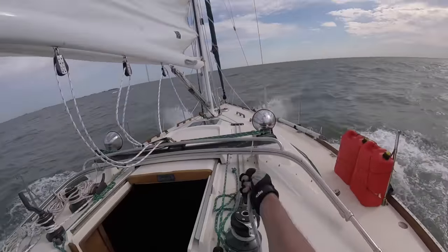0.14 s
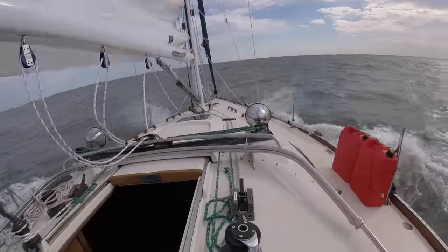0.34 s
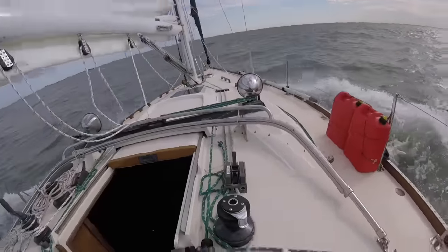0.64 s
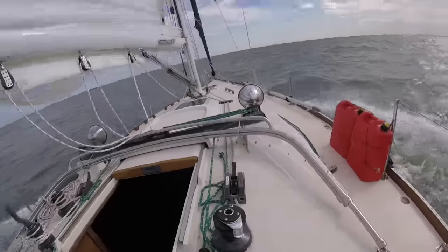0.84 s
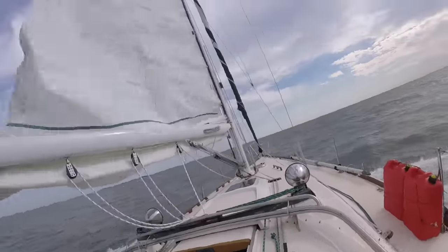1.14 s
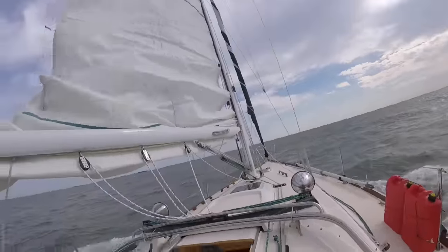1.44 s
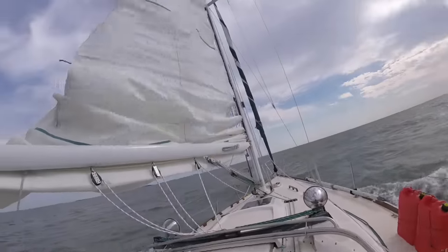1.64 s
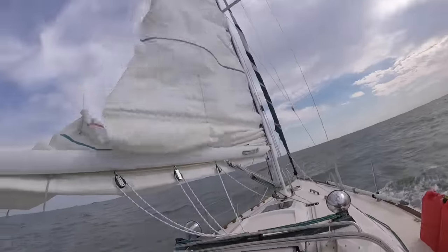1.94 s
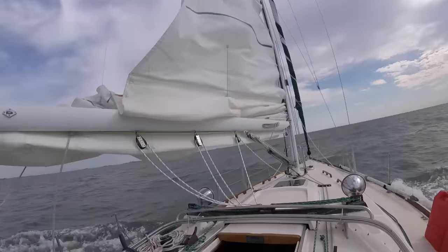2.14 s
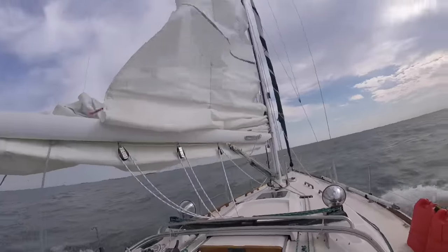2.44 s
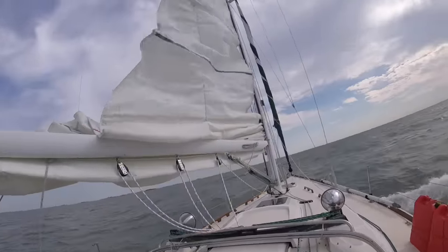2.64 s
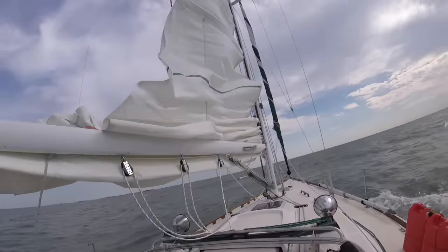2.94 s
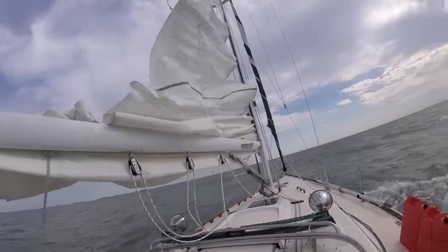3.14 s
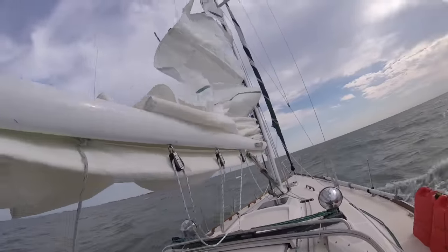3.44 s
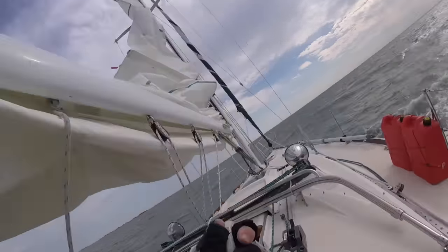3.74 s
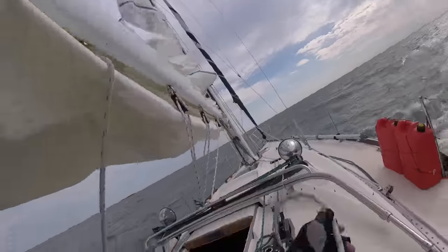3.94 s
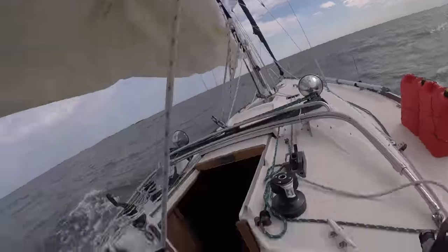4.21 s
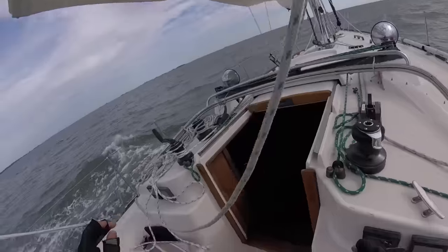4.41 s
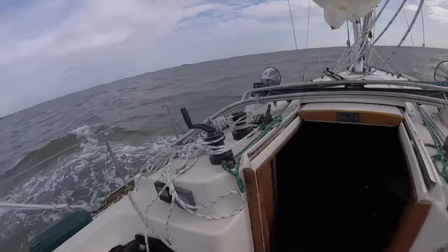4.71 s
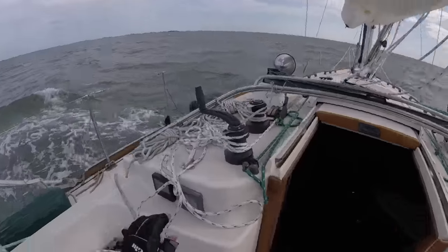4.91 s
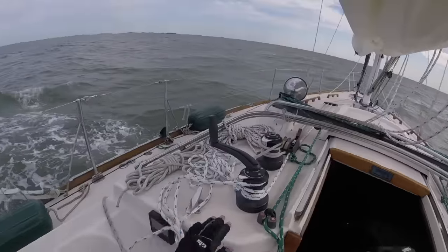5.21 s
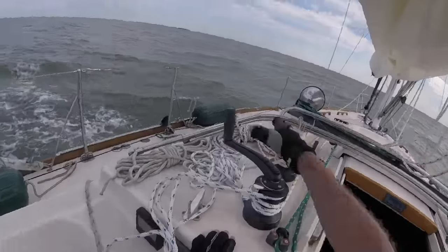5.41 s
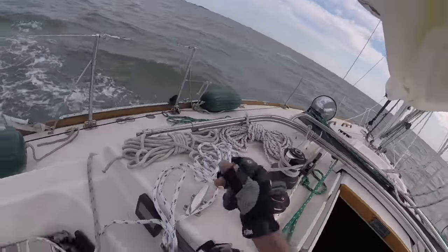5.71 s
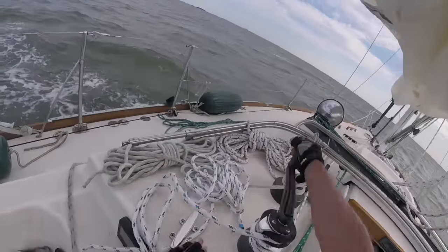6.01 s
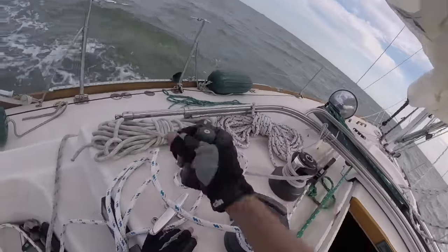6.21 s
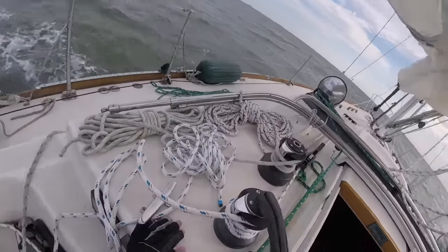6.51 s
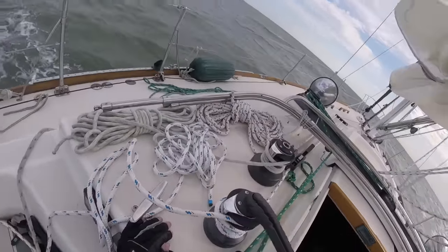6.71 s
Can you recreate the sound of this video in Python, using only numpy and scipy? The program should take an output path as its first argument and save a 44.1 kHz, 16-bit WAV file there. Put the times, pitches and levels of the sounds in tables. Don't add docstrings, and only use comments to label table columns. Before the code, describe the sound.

Heavy wind rumbles, flutters and thumps on a small microphone aboard a sailboat, with sail snaps, faint hull wash, then a rapid clacking winch.

```python
import sys
import numpy as np
from scipy import signal
from scipy.io import wavfile
from scipy.ndimage import uniform_filter1d

SR = 44100
rng = np.random.default_rng(int(sys.argv[2]) if len(sys.argv) > 2 else 0)


def makeup_ratio(level_db):
    decades = np.asarray(level_db, float) / 20
    return 10 ** decades


def persist_wave(psi):
    counts = np.round(np.clip(psi, -1, 1) * 32767).astype(np.int16)
    wavfile.write(sys.argv[1], SR, np.atleast_2d(counts).T)


N = 302526

# f/Hz, level per Hz/dB
RUMBLE_COLOUR = [(8.8, -28.5), (15, -7), (38, 3.5), (65, 2), (103, -3), (300, -21), (390, -45), (660, -120)]
# f/Hz, level per Hz/dB
FLUTTER_COLOUR = [(60, -8.5), (130, 3), (200, 0), (350, -7.5), (600, -22.5), (1000, -33), (2000, -52),
                  (4000, -64.5)]
# t/s, level/dB
BREEZE_LEVEL = [(0.0, -22.3), (0.34, -26.0), (0.63, -16.2), (0.92, -26.7), (1.64, -21.2), (1.83, -21.5),
                (2.44, -21.7), (2.56, -30.7), (2.79, -23.4), (3.11, -19.2), (3.59, -20.4), (3.9, -16.6),
                (4.22, -20.6), (4.51, -18.1), (4.83, -22.1), (5.58, -23.0), (5.77, -22.9), (6.86, -20)]
# start t/s, length/s, level/dB, flutter above it/dB
PORT_GUSTS = [(0.257, 0.064, -17.0, -18.9), (0.389, 0.041, -12.1, -12.8), (0.496, 0.042, -12.2, -3.5),
              (0.552, 0.06, -11.1, -4.0), (0.653, 0.028, -17.9, 0.1), (0.767, 0.025, -13.1, -3.0),
              (0.941, 0.028, -5.4, -25.0), (1.226, 0.052, -5.9, -21.6), (1.301, 0.053, -7.7, -9.1),
              (1.652, 0.04, -10.5, -12), (1.723, 0.073, -20.6, -3.2), (1.84, 0.033, -10.7, -8.7),
              (2.002, 0.066, -16.0, -0.9), (2.068, 0.04, -14.0, -2.6), (2.243, 0.067, -16.2, -7.4),
              (2.383, 0.127, -19.0, -6.2), (2.552, 0.028, -10, -10), (2.77, 0.06, -23.0, -1.0),
              (2.948, 0.025, -16.8, 8.2), (2.98, 0.1, -10, -3), (3.08, 0.068, -15.6, -2.1),
              (3.196, 0.045, -14.1, -10.9), (3.277, 0.043, -13.4, -10.6), (3.405, 0.097, -20.8, -7),
              (3.68, 0.086, -13, -12), (3.897, 0.054, -15.1, -8.2), (3.967, 0.065, -11.7, -13.3),
              (4.101, 0.033, -11.2, -22.1), (4.305, 0.096, -17.2, -24.3), (4.426, 0.043, -11.6, -14),
              (4.546, 0.035, -18.3, 7.1), (4.598, 0.028, -9.1, -6), (4.63, 0.04, -19, 1),
                     (4.745, 0.022, -15, -1), (4.53, .02, -20, 0), (4.763, 0.026, -4.0, -15.4),
                     (4.895, 0.028, -8.1, -19.7), (4.952, 0.02, -16.1, -4), (5.027, 0.028, -8.1, -19.2),
                     (5.214, 0.024, -14.9, -10), (5.285, 0.03, -17.0, -10.0), (5.376, 0.022, -23.1, -4.4),
                     (5.495, 0.069, -17.7, -7.4), (5.664, 0.029, -14.6, -6.3), (5.713, 0.042, -17.6, -4.8),
                     (5.806, 0.088, -11.1, -5.1), (5.927, 0.079, -14.7, -6.8), (6.073, 0.053, -17.8, 2.1),
                     (6.176, 0.033, -10.8, -9.5), (6.215, 0.12, -18.3, -1.5), (6.336, 0.051, -10.0, -7),
                     (6.458, 0.042, -10.3, -18.7), (6.512, 0.048, -10.5, -5.8),
                     (6.619, 0.037, -10.0, -18.0), (6.702, 0.059, -16.4, 2.2), (6.768, 0.031, -11.1, -0.2),
                     (6.813, 0.033, -10.8, -11.9)]
# t/s, peak level/dB, throb f/Hz
EDDY_PUFFS = [(0.39, -11.5, 82), (0.502, -10.5, 90), (0.581, -4.5, 112), (0.661, -7, 182), (0.955, -15, 77),
              (1.184, -16, 70), (1.225, -15.5, 46), (1.312, -3.5, 78), (1.544, -23, 121), (1.668, -8, 45),
              (1.734, -19, 167), (1.848, -11, 46), (1.946, -10.5, 165), (2.042, -14.5, 56),
              (2.272, -13.5, 46), (2.415, -20, 83), (2.952, -13.5, 182), (2.98, -11, 75),
              (4.024, -18.5, 180), (4.552, -10.5, 85), (4.76, -15.5, 66), (4.904, -14.5, 93),
              (4.951, -13.5, 90), (5.213, -10, 105), (5.38, -17.5, 69), (5.729, -9.5, 96),
              (5.849, -12.5, 178), (6.468, -7.5, 102), (6.63, -11.5, 57), (6.773, -9, 101)]
# t/s, peak level/dB
AIR_SLAPS = [(0.075, -26), (0.574, -19), (0.651, -14), (1.244, -22), (1.339, -16), (1.68, -16),
             (1.854, -19), (1.944, -20), (2.087, -17), (2.571, -18), (2.952, -21), (3.129, -21),
             (4.402, -21), (4.556, -18), (4.608, -23), (4.768, -20), (4.864, -29), (4.907, -24),
             (4.952, -26), (5.035, -28), (5.071, -30), (5.177, -22), (5.381, -24), (5.726, -21),
             (5.811, -24), (5.834, -22), (6.368, -24), (6.471, -17), (6.507, -26), (6.617, -27),
             (0.61, -25), (0.897, -25), (1.208, -25), (1.316, -21), (2.056, -22), (2.985, -20),
             (3.016, -24), (3.033, -20), (3.087, -24), (3.142, -24), (3.22, -24), (4.323, -28),
             (4.368, -29), (5.189, -25), (5.214, -20), (0.776, -24), (6.774, -22), (6.783, -22)]
# t/s, peak level/dB, centre f/Hz, low knock level/dB
WINCH_CLACKS = [(5.7415, -24.5, 6270, -12), (5.8067, -27, 6230, -8), (5.8893, -36, 2830, -13),
                (5.8985, -26.5, 5630, -13), (5.9134, -41, 2800, -12), (5.9346, -28.5, 5100, -15),
                (6.0166, -23, 6240, -8), (6.0457, -22, 6590, -18), (6.0937, -38, 3700, 9),
                (6.1036, -21, 6660, -17), (6.1256, -22, 6390, -19), (6.1716, -25.5, 6480, -14),
                (6.2076, -26, 6470, -19), (6.3013, -37.5, 3320, -2.5), (6.3468, -24, 7000, -6),
                (6.3665, -25, 7500, 2), (6.3806, -19, 6050, -7), (6.4044, -35, 3120, 9),
                (6.4158, -18, 5660, 2), (6.4684, -22.5, 6350, -3), (6.5091, -26, 8900, -2),
                (6.5478, -24, 6800, -6), (6.5822, -21, 6800, -8), (6.6229, -25.5, 5900, 3),
                (6.647, -39, 6600, -10), (6.6595, -20, 5720, 1), (6.745, -33.5, 5600, -7),
                (6.7613, -17.5, 4820, 3.5), (6.8247, -24.5, 5900, -8), (6.8388, -30, 3700, 6),
                (5.729, -40, 5800, -10), (5.8615, -42, 3700, -3), (5.929, -41, 6500, -10),
                (6.82, -42, 6500, -10), (6.852, -40, 9300, -12), (6.75, -36, 6000, -7)]
# t/s, f/Hz, level/dB, time to fall by 60 dB/s
METAL_RINGS = [(5.13, 1135, -33, .05), (5.13, 1500, -33, 0.06), (5.13, 3550, -42, .04),
               (6.104, 6200, -23, 0.025), (6.207, 6080, -27, 0.026), (6.349, 5690, -18, 0.028),
               (6.351, 10400, -41, .04), (6.381, 5650, -15.5, 0.06), (6.382, 10650, -44, 0.056),
               (6.418, 8800, -33, .03), (6.549, 10300, -46, 0.052), (6.47, 8550, -33, 0.044),
               (6.509, 5660, -20, 0.047), (6.51, 10300, -44, .07), (6.548, 5730, -19, 0.025),
               (6.583, 5690, -20.5, 0.043), (6.582, 10800, -32, .03), (6.628, 8450, -42, .09),
               (6.662, 9100, -32, 0.045), (6.661, 5710, -22, .035), (6.762, 8220, -11, 0.014),
               (6.763, 3620, -25, 0.038), (6.84, 3760, -40, 0.041), (6.349, 13000, -32, .03),
               (6.51, 13000, -40, .025), (6.763, 2500, -24, .03), (6.763, 4820, -24, .025),
               (6.772, 8150, -38, .04), (6.623, 2350, -30, .025), (6.659, 1400, -27, .03),
               (6.416, 2300, -28, .025), (6.548, 9200, -30, .025), (6.367, 7450, -30, .02),
               (6.556, 5720, -23, .035), (6.469, 11000, -34, .025), (6.826, 6110, -28, .025),
               (5.742, 5940, -30, .025)]
# t/s, peak level/dB, centre f/Hz, low knock level/dB
SAIL_SNAPS = [(0.0772, -26, 6500, 4), (0.5457, -29, 5070, 4), (0.6455, -24, 5400, 6),
              (0.7285, -31, 5900, -12), (0.826, -13, 8600, -7), (1.2894, -33, 3270, -2),
              (1.4127, -29, 5030, -11.5), (1.6082, -36, 6340, 6), (1.8344, -39, 3890, 6),
              (1.8623, -29, 5190, -3), (1.9618, -41, 3320, 7.5), (2.376, -34, 3550, -11),
              (2.7144, -35, 6300, -8), (2.9537, -28.5, 5600, -1), (3.1298, -31, 7900, -17),
              (3.14, -33.5, 3550, 1.5), (3.143, -31, 7900, -15), (3.2181, -38, 3300, 5),
              (3.2867, -30, 5160, -10), (3.555, -38.5, 5600, 6), (3.864, -40, 3260, 0),
              (4.278, -40, 4500, 3), (4.068, -34, 6400, -0.5), (4.148, -44, 5110, 9),
              (5.0325, -49, 2600, 15), (5.1262, -38, 4900, 3), (5.132, -38, 3600, 4),
              (5.2165, -52, 2400, 14), (5.5922, -41, 3280, 7), (5.605, -39.5, 6360, -4)]
# t/s, level/dB
WAKE_LEVEL = [(0, -48.5), (.44, -45.5), (.73, -45), (1.14, -45.5), (1.33, -48), (2.11, -50), (2.56, -50),
              (3.06, -52), (3.75, -48), (4.27, -47.5), (4.51, -52), (4.84, -50.5), (5.18, -56), (5.69, -52),
              (5.96, -48), (6.4, -48), (6.7, -49), (6.86, -47)]
# start t/s, length/s, level above the steady rush/dB
HULL_SLOSHES = [(0.84, .11, 3), (0.87, .04, 3), (1.79, .05, 3), (3.5, .06, 2), (3.67, .08, 5),
                (3.82, .05, 3), (3.895, .07, 5), (4.043, .04, 3), (4.19, .04, 2), (4.246, .054, 4),
                (4.39, .04, 3), (5.075, .05, 4), (5.135, .04, 4), (5.185, .025, 11), (5.4, .03, 4),
                (5.45, .06, 5), (6.42, .05, 4), (6.66, .05, 4), (5.58, .06, 4), (0.92, .25, 2)]
# f/Hz, level per Hz/dB
HISS_COLOUR = [(1100, -24), (1800, -0.5), (3300, -3.5), (4100, -9.5), (4900, -3), (5700, -4.5), (6550, -4),
               (7100, -12.5), (9200, -19), (9800, -26.5), (11000, -29), (12000, -39.5), (14000, -42),
               (16500, -56)]
# f/Hz, level per Hz/dB
WASH_COLOUR = [(250, -8.5), (500, 2), (1000, -4), (1600, -7.5), (2500, -18), (4000, -27.5)]
# t/s, peak level/dB
SWAP_TICKS = [
    (4.506, -40),
    (4.57, -34.5),
    (4.9554, -43),
    (4.9851, -36),
    (5.177, -42),
    (5.3054, -49),
]

GUST_RISE_S, GUST_FALL_S = .007, .005
BREEZE_RUMBLE_DB, BREEZE_FLUTTER_DB = -0.6, -7.5
PUFF_S = .027
FLICKS_PER_S, FLICK_S, FLICK_DB = 60, .0011, -3.5
CLACK_EDGE_DB, TOOTH_DB = -12, -4
BOUNCE_S, BOUNCE_DB = .004, -10
RATTLE_DB, RATTLE_T60_S = -10, .014
DECK_DB, DECK_T60_S = -20, .08
RING_KNEE_DB, RING_ROUGH = -8, .25
SNAP_MID_DB, SNAP_T60_S, SNAP_T60_S_PER_DB = -33, .032, .0006
SNAP_EDGE_DB, SNAP_EDGE_PER_DB = -20, .6
SWAP_S, SHELTER_HISS_DB, SHELTER_WASH_DB, WASH_ABOVE_DB = 4.508, -10, -8, 7


def evened(x):
    return x / np.sqrt(np.mean(x ** 2) + 1e-20)


def peaked(x):
    return x / np.max(abs(x))


def add(mix, s, sound):
    part = mix[round(s * SR):][:len(sound)]
    part += sound[:len(part)]


def curves(rows):
    s, *columns = np.transpose(rows)
    return [np.interp(np.arange(N) / SR, s, c) for c in columns]


def band(x, lo_hz, hi_hz, order=2):
    limits = [lo_hz, min(hi_hz, SR / 2.2)]
    return signal.sosfilt(signal.butter(order, limits, "bandpass", fs=SR, output="sos"), x)


def noise(colour, size, patchy_db, flicker_db):
    hop, hz = size // 4, np.fft.rfftfreq(size, 1 / SR)
    a, b, patches = rng.standard_normal((N // hop + 5, len(hz), 3)).T
    flicker = evened(uniform_filter1d(patches[0], size=3))
    patches = uniform_filter1d(patches, size=6, axis=0)
    patches = evened(uniform_filter1d(patches, size=8, axis=1))
    f, db = np.transpose(colour)
    shape_db = np.interp(np.log(hz + 1), np.log(f), db, left=-90, right=-90)[:, None]
    z = (a + 1j * b) * makeup_ratio(shape_db + patchy_db * patches + flicker_db * flicker)
    return evened(signal.istft(z, nperseg=size, noverlap=size - hop)[1][:N])


def lumps(hz):
    lowpass = signal.butter(2, hz, fs=SR, output="sos")
    return evened(signal.sosfilt(lowpass, rng.standard_normal(N)))


def steadied(x, size):
    power = uniform_filter1d(uniform_filter1d(x ** 2, size), size)
    swell = np.sqrt(power + 0.074)
    return evened(x / swell ** 0.9)


def burst(t60, rise, draw):
    t = np.arange(len(draw)) / SR
    return draw * (1 - np.exp(-t / rise)) * makeup_ratio(-60 * t / max(t60, .004))


def crack(draw, hz, low_db, top_db, t60, low_t60, low_hz, scratch_db):
    body = peaked(band(burst(t60, 0.0008, draw), hz * 0.76, hz * 1.08))
    scratch = peaked(band(burst(.8 * t60, 0.0009, np.roll(draw, shift=999)), 1700.0, 7500.))
    knock = peaked(band(burst(low_t60, 0.0011, draw), .5 * low_hz, 1.89 * low_hz))
    edge = peaked(band(burst(t60, 0.00046, draw[::-1]), 5900.0, 9400.0))
    return body + makeup_ratio(scratch_db) * scratch + makeup_ratio(low_db) * knock + makeup_ratio(top_db) * edge


def strength():
    t, (breeze_db,) = np.arange(N) / SR, curves(BREEZE_LEVEL)
    rumble = makeup_ratio(2 * (breeze_db + BREEZE_RUMBLE_DB))
    flutter = makeup_ratio(2 * (breeze_db + BREEZE_FLUTTER_DB))
    for s, length, db, flutter_db in PORT_GUSTS:
        u = t[:round((length + .3) * SR)]
        rise = np.minimum(u / GUST_RISE_S, 1) ** 2
        shape = rise * np.exp(-np.maximum(u - length + GUST_FALL_S, 0) / GUST_FALL_S)
        add(rumble, s, makeup_ratio(2 * db) * shape)
        add(flutter, s, makeup_ratio(2 * (db + flutter_db)) * shape)
    return 10 * np.log10(rumble), 10 * np.log10(flutter)


def wind():
    rumble_db, flutter_db = strength()
    lump = lumps(hz=30.4)
    rumble = steadied(noise(RUMBLE_COLOUR, size=8192, patchy_db=2.5, flicker_db=2.5), size=1400)
    flutter = steadied(noise(FLUTTER_COLOUR, size=2048, patchy_db=1.5, flicker_db=-1.0), size=900)
    force_db = flutter_db - 3 + 3.0 * lump
    rasp = evened(band(rng.standard_normal(N), 380., 917.0))
    rasp_db = -40 + 1.45 * np.minimum(force_db + 20.5, 4) + 3 * lumps(hz=90.)
    return makeup_ratio(rumble_db + 1.9 * lump) * rumble + makeup_ratio(force_db) * flutter + makeup_ratio(rasp_db) * rasp


def puffs():
    out, t = np.zeros(N), np.arange(5000) / SR
    draws = rng.standard_normal((len(EDDY_PUFFS), 5000))
    u = t / (0.29 * PUFF_S)
    swell = u * np.exp(1 - u)
    for (s, db, hz), draw in zip(EDDY_PUFFS, draws):
        sagging_hz = hz * (1.25 - 0.125 * np.minimum(u, 5))
        throb = np.sin(2 * np.pi * np.cumsum(sagging_hz) / SR + 3 * draw[0])
        ragged = peaked(band(draw * swell, 170.0, 455.0))
        add(out, s - .003, makeup_ratio(db - 3.5) * (swell * throb + makeup_ratio(-4) * ragged))
    return out


def slaps():
    out, u = np.zeros(N), (np.arange(1500) / SR - .004) / 0.0006
    draws = rng.standard_normal((len(AIR_SLAPS), 1500))
    for (s, db), draw in zip(AIR_SLAPS, draws):
        narrow = u * np.exp(0.1 * draw[0])
        spike = (1 - narrow ** 2) * np.exp(-narrow ** 2 / 2)
        skirt = peaked(band(burst(0.033, .003, draw), 350.0, 1000.0))
        add(out, s - .0015, makeup_ratio(db + 5.5) * (spike + makeup_ratio(-12) * skirt))
    return out


def flicks():
    u = np.arange(-400, 400) / SR / FLICK_S
    spike = (1 - u ** 2) * np.exp(-u ** 2 / 2)
    flick_db = strength()[1] + FLICK_DB + 3.5 * np.minimum(rng.exponential(1, N), 3)
    strikes = rng.random(N) < FLICKS_PER_S / SR
    return signal.oaconvolve(makeup_ratio(flick_db) * strikes, spike, "same")


def rattle(chance, t):
    pitch, late, size = chance[:, :, None]
    u = np.maximum(t - 2 * BOUNCE_S * late, 0)
    tones = np.sin(2 * np.pi * 3000. * 3.4 ** pitch * u)
    return peaked((makeup_ratio(10 * size - 60 * u / RATTLE_T60_S) * tones).sum(axis=0))


def clacks():
    out, t = np.zeros(N), np.arange(4000) / SR
    draws = rng.standard_normal((len(WINCH_CLACKS), 4000))
    chances = rng.random((len(WINCH_CLACKS), 3, 8))
    for (s, db, hz, low_db), draw, chance in zip(WINCH_CLACKS, draws, chances):
        blow = crack(draw, hz, low_db, CLACK_EDGE_DB, 0.021, 0.035, low_hz=1740.0, scratch_db=-9.5)
        tooth = makeup_ratio(TOOTH_DB - 60 * t / .022) * np.sin(2 * np.pi * hz * t)
        tail = peaked(band(burst(DECK_T60_S, .004, np.roll(draw, shift=2000)), 1200., 9000.))
        clack = blow + tooth + makeup_ratio(RATTLE_DB) * rattle(chance, t) + makeup_ratio(DECK_DB) * tail
        add(out, s - .0002, makeup_ratio(db - 2.5) * clack)
        again = crack(np.roll(draw, shift=500), hz, low_db, CLACK_EDGE_DB, 0.016, 0.03,
                      low_hz=1740.0, scratch_db=-8)
        add(out, s + BOUNCE_S * (.6 + chance[0, 0]), makeup_ratio(db - 4 + BOUNCE_DB) * again)
    return out


def rings():
    out, t = np.zeros(N), np.arange(4000) / SR
    draws = rng.standard_normal((len(METAL_RINGS), 4000))
    for (s, hz, db, t60), draw in zip(METAL_RINGS, draws):
        rough = evened(uniform_filter1d(uniform_filter1d(draw, size=90), size=60))
        tone = np.sin(2 * np.pi * hz * t + RING_ROUGH * rough)
        pair = tone + 0.35 * np.sin(2 * np.pi * hz * 1.018 * t + draw[0])
        fade = makeup_ratio(-60 * t / (.6 * t60)) + makeup_ratio(RING_KNEE_DB - 60 * t / (1.5 * t60))
        start = 1 - np.exp(-t / 0.0015)
        add(out, s, makeup_ratio(db - 2.5 + 1.5 * rough[::-1]) * fade * pair * start)
    return out


def sail():
    out, draws = np.zeros(N), rng.standard_normal((len(SAIL_SNAPS), 4000))
    for (s, db, hz, low_db), draw in zip(SAIL_SNAPS, draws):
        harder_db = db - SNAP_MID_DB
        t60 = max(SNAP_T60_S + SNAP_T60_S_PER_DB * harder_db, .01)
        top_db = SNAP_EDGE_DB + SNAP_EDGE_PER_DB * harder_db
        snap = crack(draw, hz, low_db + 4.5, top_db, t60, 1.4 * t60, low_hz=1246.0, scratch_db=-5)
        add(out, s - .001, makeup_ratio(db - 5.0) * snap)
    return out


def sloshes():
    out = np.zeros(N)
    for s, length, db in HULL_SLOSHES:
        add(out, s, db * np.sqrt(np.hanning(round(length * SR))))
    return out


def wake():
    (rush_db,), slosh_db = curves(WAKE_LEVEL), sloshes()
    sheltered = np.arange(N) / SR > SWAP_S
    hiss_db = rush_db + .4 * slosh_db + SHELTER_HISS_DB * sheltered
    wash_db = rush_db + slosh_db + WASH_ABOVE_DB + SHELTER_WASH_DB * sheltered
    bursts = rng.random(N) < 1500 / SR
    pops = makeup_ratio(3.0 * rng.exponential(1, N)) * bursts * rng.choice([-1, 1], N)
    fizz = evened(band(pops, 6200.0, 7200., order=3))
    hiss = noise(HISS_COLOUR, size=512, patchy_db=-1.2, flicker_db=1.93) + makeup_ratio(-16) * fizz
    wash = noise(WASH_COLOUR, size=512, patchy_db=1.1, flicker_db=2.2)
    return makeup_ratio(hiss_db + 0.5) * hiss + makeup_ratio(wash_db - 1.8) * wash


def scene():
    air = wind() + puffs() + slaps() + flicks()
    housing = signal.butter(4, 9700., fs=SR, output="sos")
    boat = signal.sosfilt(housing, clacks() + rings() + sail()) + wake()
    return (0.86 * np.tanh(air / 1.005) + boat)[None]


def low_pass(x):
    return signal.sosfilt(signal.butter(12, 15760, fs=SR, output="sos"), x)


def record(dry):
    steps = np.zeros(N)
    for s, db in SWAP_TICKS:
        add(steps, s, makeup_ratio(db + 5.5) * np.array([1., -1.]))
    ticks = band(steps, 1500., 9500., order=3)
    ease = np.minimum(np.arange(N)[::-1] / 100, 1)
    return low_pass((dry + ticks) * ease)


dry = scene()
out = record(dry)
persist_wave(out)
```